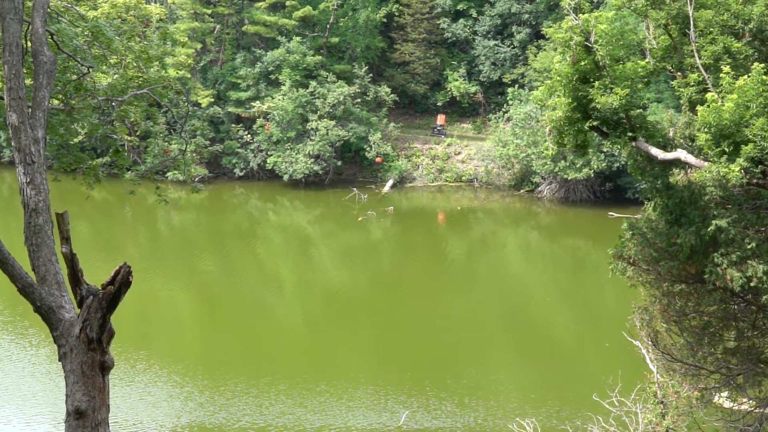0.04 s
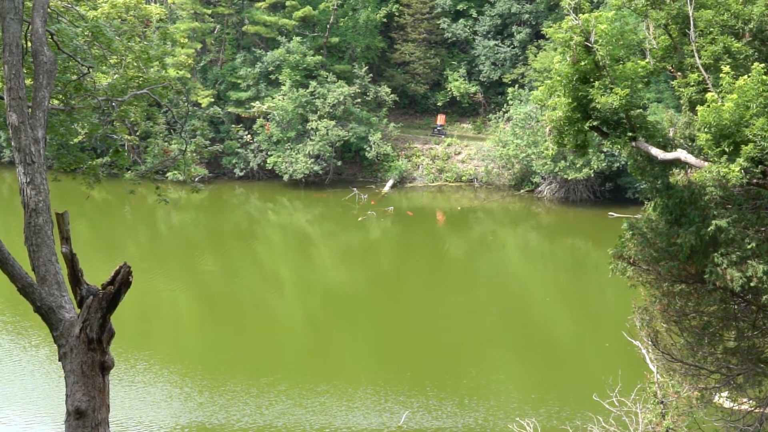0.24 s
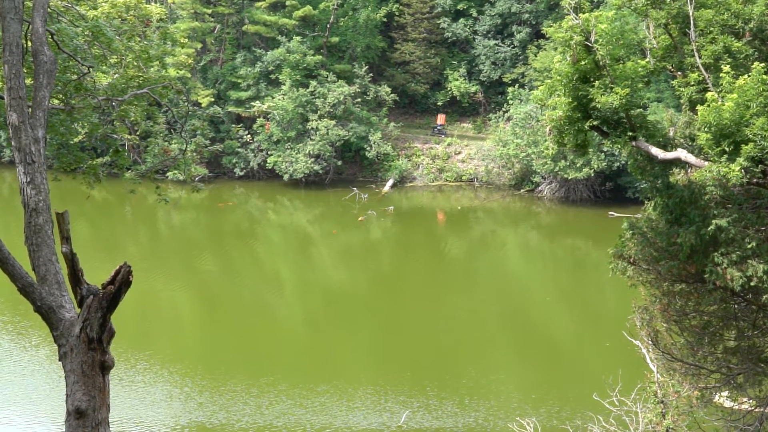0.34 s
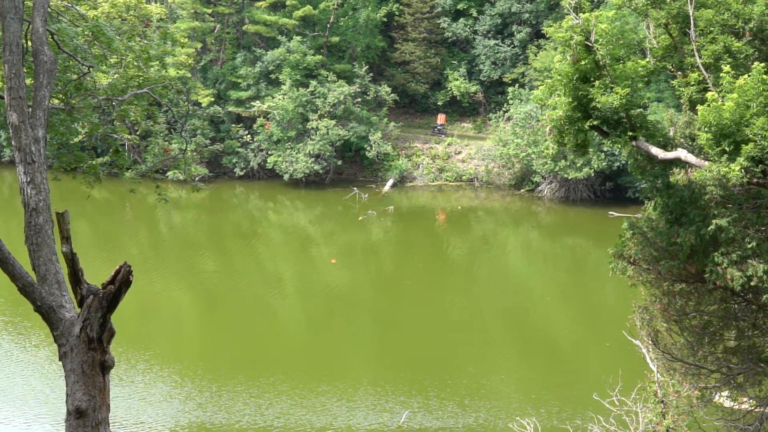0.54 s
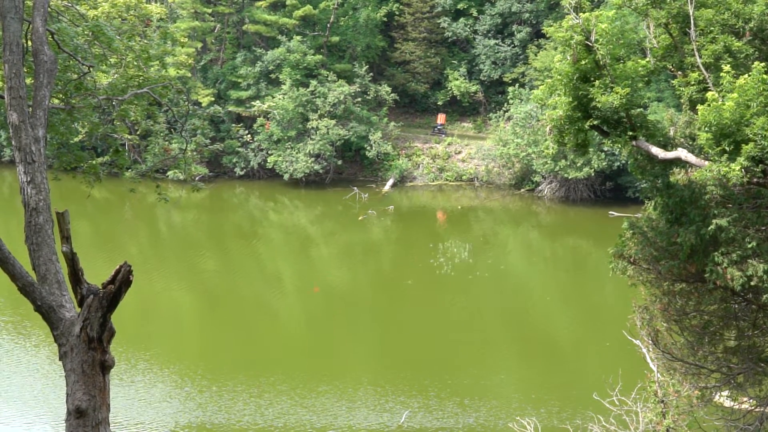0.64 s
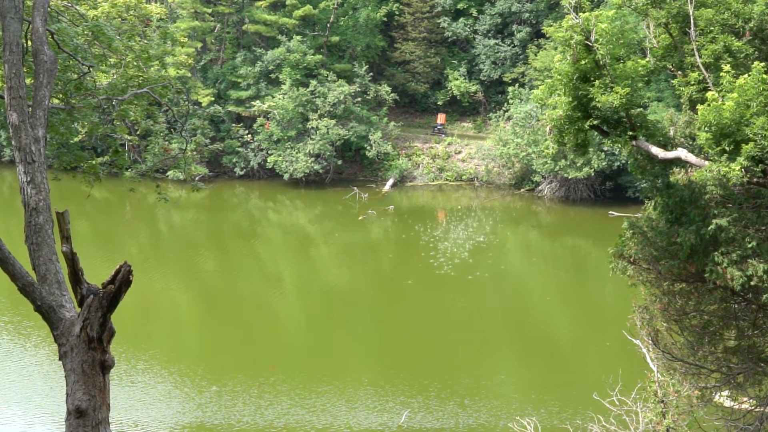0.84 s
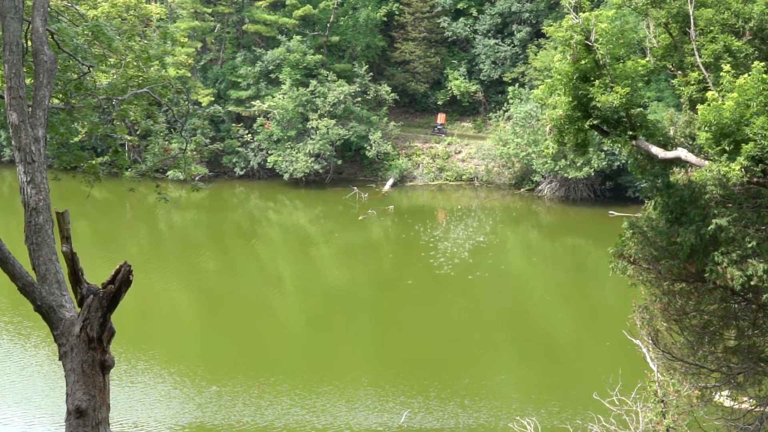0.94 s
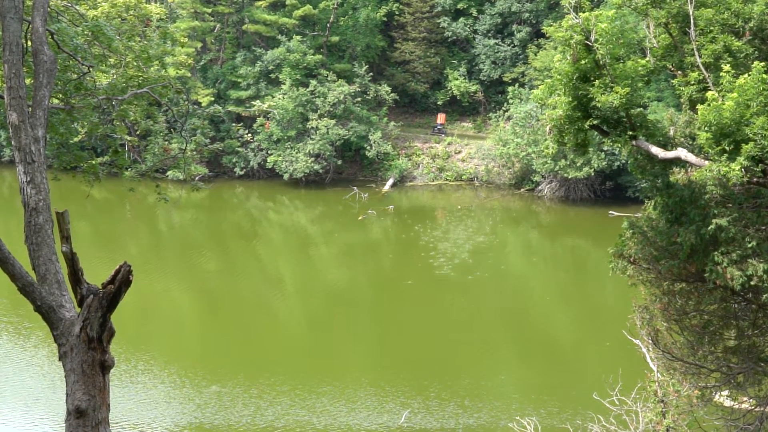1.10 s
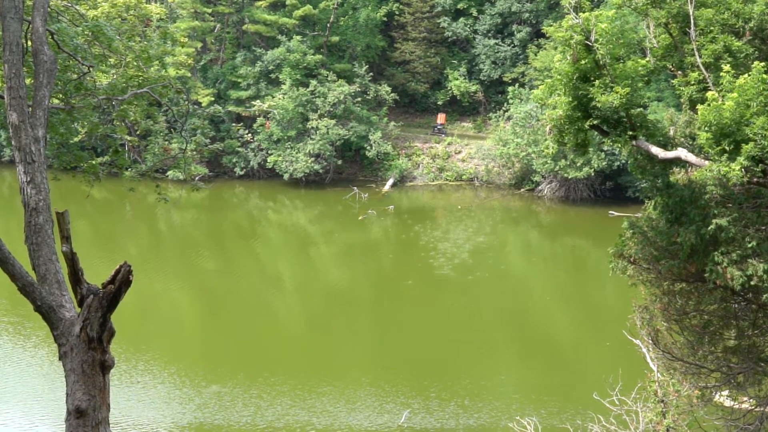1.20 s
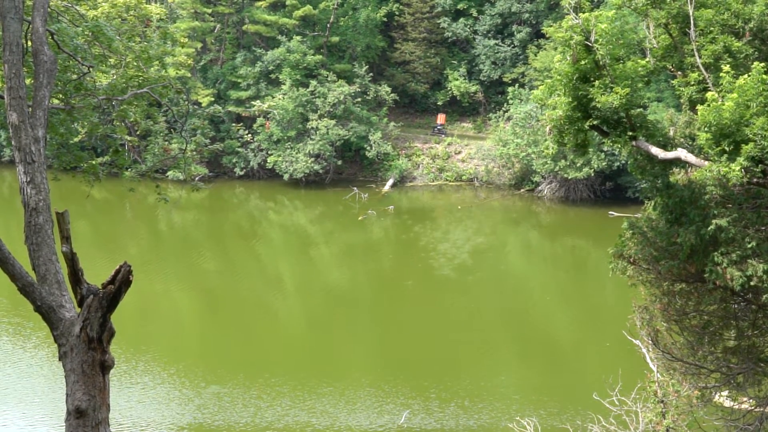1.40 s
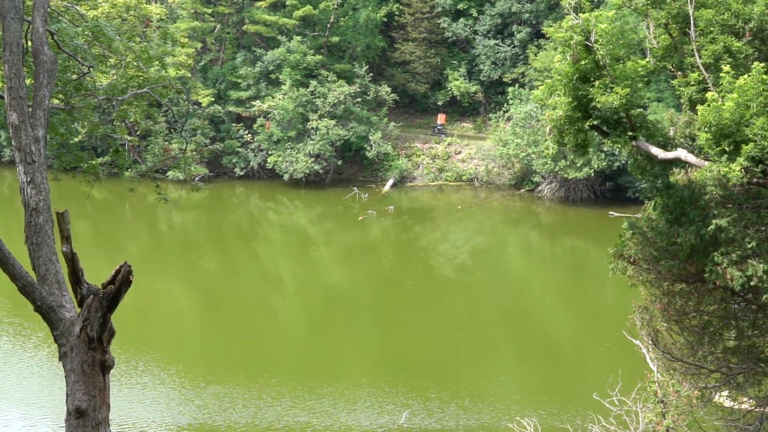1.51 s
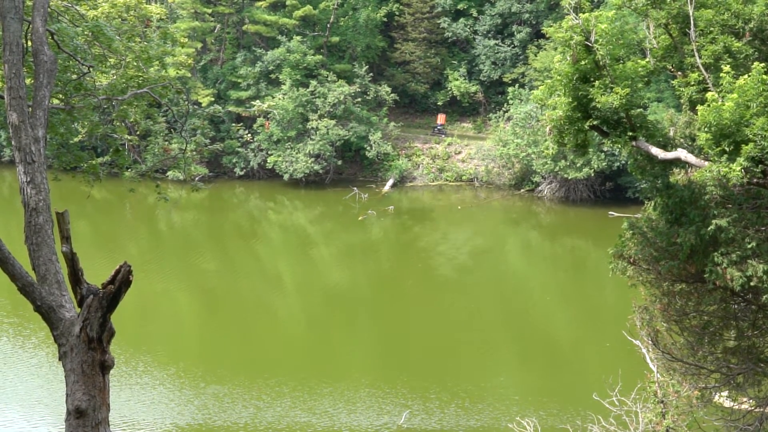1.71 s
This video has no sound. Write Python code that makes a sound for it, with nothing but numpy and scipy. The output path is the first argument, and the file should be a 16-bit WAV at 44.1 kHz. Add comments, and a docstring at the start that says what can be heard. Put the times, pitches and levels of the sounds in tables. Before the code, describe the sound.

A rifle fires once close to the microphone, loud enough to overload it. The blast roars through nearby trees and rolls back duller from the pond's far bank. As it fades, the rifle's action makes a few faint metal clacks.

```python
"""A rifle shot across a wooded pond

A rifle fires close to the microphone: its steel action (the moving parts) snaps, and the muzzle blast
overloads the input. Near trees and then the side banks scatter the blast back as a bright roar; the far
bank answers with a duller, rolling echo. As that dies into the outdoor background, a very faint whistle
sinks and the action is worked, with a few small metal clacks."""
import sys
import numpy as np
from scipy import signal
from scipy.fft import rfft, irfft
from scipy.io import wavfile

SR = 44100
rng = np.random.default_rng(int(sys.argv[2]) if len(sys.argv) > 2 else 0)


def store_wav(level_fs):
    """Save 16-bit WAV to argv[1]."""
    pcm = np.round(np.clip(np.atleast_2d(level_fs), -1, 1) * 32767)
    wavfile.write(sys.argv[1], SR, pcm.T.astype(np.int16))


N = 77175
SHOT_S = 0.2063


def undb(db):
    """Turn decibels (dB) into a number to multiply by."""
    return 10 ** (np.asarray(db) / 20)


def clock():
    """The time of each sample, in seconds."""
    return np.arange(N) / SR


def freqs():
    """The frequencies that make up a spectrum, in Hz."""
    return np.maximum(np.arange(N // 2 + 1) * SR / N, 1)


def gains(colour):
    """Join the points of a colour (rows of Hz and dB) into a gain for every frequency."""
    hz, db = np.array(colour).T
    return undb(np.interp(np.log(freqs()), np.log(hz), db))


def unit(x):
    """Scale a signal to an average power of 1."""
    return x / np.sqrt(np.mean(x ** 2))


def pan(db):
    """Left and right gains. A pan is how many dB louder the left ear is than the right."""
    return undb(np.array([[db], [-db]]) / 2)


def fade(start, fade_s):
    """Start suddenly, then die away. The fade time is how long a 60 dB drop takes."""
    age = clock() - start
    return (age >= 0) * undb(-60 * np.maximum(age, 0) / fade_s)


def causal(gain):
    """A filter with these gains that never sounds before its input (minimum phase)."""
    cepstrum = irfft(np.log(gain + 1e-9), N)
    cepstrum[1:N // 2 + 1] *= 2
    cepstrum[N // 2 + 1:] = 0
    return np.exp(rfft(cepstrum))


def tone(hz):
    """A pure tone that starts at a random point of its wave in each ear."""
    return np.sin(2 * np.pi * (hz * clock() + rng.random((2, 1))))


def waver(width_hz):
    """A random stereo wobble; multiplying a tone by it spreads the pitch over width_hz."""
    noise = rfft(rng.standard_normal((2, N)))
    return unit(irfft(noise / (1 + (2 * freqs() / width_hz) ** 2), N))


def scatter(colour, grain_db=0, tilt_db=0, envelope=1):
    """Noise like many reflections, uneven by grain_db: bass alike in both ears, treble unrelated."""
    # Stereo width. Each row: frequency in Hz, side (what differs between ears) over mid in dB.
    side_levels = [(60, -38), (140, -43), (350, -11.5), (700, -9), (1400, -1.5), (2800, 1.9), (6000, -1.5),
                   (14000, -1)]
    width = gains(side_levels)
    noise = rng.standard_normal((2, N))
    grains = np.repeat(rng.standard_normal(N // 16 + 1), 16)[:N]
    arrivals = unit(noise * undb(grain_db * grains))
    gain = gains(colour) * undb(tilt_db * np.log2(np.maximum(freqs(), 1500)))
    gain = gain / np.sqrt(np.mean(gain ** 2 * (1 + width ** 2)))  # colour sets tone, not loudness
    mid, side = rfft(arrivals * envelope) * causal(gain)
    side = side * causal(width)
    return irfft(np.array([mid + side, mid - side]), N)


def burst(colour, start, db, fade_s, pan_db, tilt_db=0):
    """One short impact: noise that starts at once and dies away."""
    return scatter(colour, tilt_db=tilt_db, envelope=fade(start, fade_s)) * undb(db) * pan(pan_db)


def echo(colour, start, rise, hold, db, fall_db_s, air_db_s, grain_db, pan_db):
    """Scattered sound swells, holds and fades (times in seconds); longer paths lose more treble."""
    age = np.maximum(clock() - start, 0)
    fading_s = np.maximum(age - rise - hold, 0)
    envelope = np.minimum(age / rise, 1) * undb(db - fall_db_s * fading_s)
    spectrum = rfft(scatter(colour, grain_db))
    centres_hz = np.geomspace(400, 16000, 9)
    out = 0
    for hz, share in zip(centres_hz, np.eye(len(centres_hz))):
        band = irfft(spectrum * np.interp(freqs(), centres_hz, share), N)
        out = out + band * undb(-air_db_s * hz / 1000 * fading_s)  # air takes dB per second per kHz
    return out * envelope * pan(pan_db)


def background():
    """A low outdoor rush that dips at the shot and slowly comes part of the way back."""
    # Colour of the rush. Each row: frequency in Hz, relative level in dB.
    outdoors = [(15, -56), (25, -24), (66, -10.5), (175, -15.5), (195, -11.5), (427, -14.5), (503, -18.5),
                (607, -13), (677, -19), (754, -10.5), (818, -17), (1290, -26.5), (1520, -32.5),
                (2160, -42.5), (16000, -53)]
    dip_db = np.interp(clock(), [SHOT_S, 0.25, 1.75], [0, -10, -6])
    return scatter(outdoors) * undb(-36 + dip_db)


def shot():
    """The action snaps, then the muzzle sends out a pressure wave with a crack and a low thump."""
    # Snaps just before the blast. Each row: start in seconds, level in dB, fade in seconds, pan in dB.
    snaps = [(.1969, -12, 0.0059, 9.5), (0.2035, -23.5, 0.019, 31)]
    # Colours of the snaps and the crack. Each row: frequency in Hz, relative level in dB.
    snap_colour = [(200, 11), (1200, 13), (3000, 4), (4600, 2), (7000, 6), (14000, 13), (17000, 10)]
    crack_colour = [(40, -12), (200, -18), (800, -5), (1800, -8), (4000, 1), (7000, -12), (9300, 2.5),
                    (13000, -7.5), (16000, -15)]
    push_s, pan_db = 0.000756, 5.5
    thump_hz, rise_s, fade_s = 75.6, 0.012, 0.049
    age = np.maximum(clock() - SHOT_S, 0)
    wave = np.sin(np.pi * np.minimum(age / push_s, 2)) * undb(-6) * pan(pan_db)  # one push, one pull
    thump_db = -21.5 - 60 * np.maximum(age - rise_s, 0) / fade_s
    thump = np.sin(2 * np.pi * thump_hz * age) * np.minimum(age / rise_s, 1) * undb(thump_db)
    crack = burst(crack_colour, SHOT_S + push_s, db=-7, fade_s=0.025, pan_db=pan_db)
    return wave + thump + crack + sum(burst(snap_colour, *row) for row in snaps)


def woods():
    """The blast comes back from ever farther away: trees, side banks, far leaves, far bank, hills."""
    # Colours of the echoes. Each row: frequency in Hz, relative level in dB.
    tree_colour = [(18, -72), (30, -49), (138, -7.5), (210, -8.5), (259, -1.5), (415, -3.5), (684, -5),
                   (913, -5.5), (1860, -11), (2680, -11.5), (3220, -14.5), (7090, -12), (16000, -24.5)]
    bank_colour = [(18, -53), (30, -36), (64, -34), (127, -12.5), (227, -7), (303, -5), (345, -5),
                   (415, -6), (461, -5.5), (584, -11), (721, -4), (801, -9.5), (866, -6), (1910, -17),
                   (7270, -18.5), (16000, -38)]
    leaf_colour = [(300, -16), (1500, 3.5), (3000, -1), (5300, 0), (7000, -10), (9000, -11.5), (12000, -28),
                   (16000, -73)]  # a hiss from the far waterline
    far_colour = [(30, -57), (59, -44), (84, -12), (138, -9.5), (175, -1.5), (233, -1.5), (336, 1),
                  (450, -9), (660, 0.5), (900, -4), (1320, -15), (2300, -21), (3400, -32), (5300, -34.5),
                  (7000, -36.5), (9200, -44.5), (12000, -57), (16000, -77)]
    hill_colour = [(60, -27.5), (170, -3.5), (320, 1.5), (480, -3.5), (700, -10), (900, -5.5), (1300, -10),
                   (3000, -34), (12000, -52)]  # a dull roll
    # Sharp echoes off single trunks and rock faces.
    # Each row: start in seconds, level in dB, fade in seconds, pan in dB.
    near_slaps = [(0.2174, -14, 0.036, 6), (.2475, -11.5, 0.027, 8)]
    far_slaps = [(0.558, -22, 0.11, 0), (.714, -18, 0.12, -1.5), (0.781, -19, 0.023, 3),
                 (.8375, -11.5, 0.018, -5), (0.853, -17, 0.032, -2), (.955, -22, 0.016, -7),
                 (1.188, -28.5, 0.15, 2), (1.248, -27.5, 0.056, 1.5)]
    trees = echo(tree_colour, SHOT_S, rise=0.0027, hold=0.1, db=-15,
                 fall_db_s=66, air_db_s=2.5, grain_db=-1, pan_db=1.1)
    banks = echo(bank_colour, 0.27, rise=0.091, hold=0.11, db=-15,
                 fall_db_s=21, air_db_s=5.5, grain_db=1, pan_db=-1.25)
    leaves = echo(leaf_colour, 0.681, rise=0.08, hold=0.044, db=-26.5,
                  fall_db_s=44.5, air_db_s=3, grain_db=-1, pan_db=0)
    far_bank = echo(far_colour, 0.747, rise=0.032, hold=0.15, db=-18,
                    fall_db_s=30.5, air_db_s=2, grain_db=2, pan_db=-0.8)
    hills = echo(hill_colour, 0.93, rise=0.11, hold=0.14, db=-33.5,
                 fall_db_s=10.5, air_db_s=8, grain_db=1.5, pan_db=1)
    flutter = undb(0.64 * waver(width_hz=70)[0])  # clumps of trees make the roar flutter
    slaps = sum(burst(tree_colour, *row) for row in near_slaps)
    slaps += sum(burst(far_colour, *row) for row in far_slaps)
    return (trees + banks + leaves + far_bank + hills) * flutter + slaps


def booms():
    """Where a whole slope faces the shot, it sends back a low swell that dies quickly."""
    # Colour of a boom. Each row: frequency in Hz, relative level in dB.
    colour = [(40, -28), (100, -13), (170, -2.5), (260, 1), (390, 3), (520, -6), (1500, -48), (8000, -67)]
    # One boom per slope. Each row: start in seconds, rise in seconds, level in dB, fall in dB per second.
    slopes = [(.33, 0.064, -20, 153), (.545, 0.017, -27.5, 258), (.82, 0.037, -23, 108)]
    out = 0
    for start, rise, db, fall_db_s in slopes:
        age = np.maximum(clock() - start, 0)
        level = undb(db - fall_db_s * np.maximum(age - rise, 0))
        out = out + scatter(colour) * np.minimum(age / rise, 1) * level
    return out


def whistle():
    """A very faint, blurred whine sinks in pitch as the echoes die."""
    # Path of the whine. Each row: time in seconds, pitch in Hz, level in dB.
    path = [(1.05, 9020, -79), (1.32, 8750, -62.5), (1.44, 8500, -73)]
    times, hz, db = np.array(path).T
    pitch = np.interp(clock(), times, hz)
    level = np.interp(clock(), times, undb(db), left=0, right=0)
    return np.sin(2 * np.pi * np.cumsum(pitch) / SR) * waver(width_hz=160) * level


def action():
    """The rifle's steel parts slide, knock, ping and ring faintly; the trees answer softly."""
    # Colours of the steel and of its echo. Each row: frequency in Hz, relative level in dB.
    steel = [(1500, -18), (2400, -8), (3200, -0.5), (4000, -10), (5100, -0.5), (6400, -9), (8000, -3.5),
             (9100, -8), (10400, -5), (11800, -17), (14300, -11), (16000, -14)]
    echo_colour = [(1500, -3), (3000, 6), (5000, 0), (7800, 2.5), (10500, -20), (13000, -16), (16000, -15)]
    # Knocks of steel on steel. Each row: start in seconds, level in dB, fade in seconds, pan in dB,
    # treble tilt in dB per octave, ping pitch in Hz, ping level in dB relative to the knock.
    clacks = [(1.4412, -31.5, 0.021, -1.5, 0.5, 7900, -11), (1.45, -34, 0.016, 3, 4, 5350, -1),
              (1.461, -45, 0.021, -6, 1, 3150, 10.5), (1.474, -48, .025, 0, 4, 14300, -3),
              (1.493, -47, .015, 6, 0, 5300, -8), (1.5675, -35, 0.013, -4, -8.5, 4500, -1)]
    # Ringing notes. Each row: pitch in Hz, level in dB relative to each knock, fade in seconds.
    rings = [(3040, -20, 0.61), (4737, -20.5, 0.78), (6700, -30, 0.56), (7740, -24, 0.74)]
    ring_rise_s = 0.065
    slide = echo(steel, 1.465, rise=0.016, hold=0.01, db=-47,
                 fall_db_s=95, air_db_s=13, grain_db=1, pan_db=2)
    tree_echo = echo(echo_colour, 1.48, rise=0.084, hold=0.05, db=-56.5,
                     fall_db_s=45, air_db_s=6, grain_db=5, pan_db=-3)
    out = slide + tree_echo
    for start, db, fade_s, pan_db, tilt_db, ping_hz, ping_db in clacks:
        out += burst(steel, start, db, fade_s, pan_db, tilt_db)
        out += tone(ping_hz) * fade(start, fade_s) * undb(db + ping_db) * pan(pan_db)
    for hz, ring_db, fade_s in rings:
        energy = 0
        for start, db, *_ in clacks:
            swell = np.clip((clock() - start) / ring_rise_s, 0, 1)
            energy += (fade(start, fade_s) * swell * undb(db + ring_db)) ** 2
        out += tone(hz) * waver(width_hz=93) * np.sqrt(energy)  # a rough, uneven ring
    return out


def scene():
    """Add all the sounds together, in stereo."""
    return background() + shot() + woods() + booms() + whistle() + action()


def record(dry):
    """The overloaded input flattens the loudest peaks, then a filter cuts the highest treble."""
    top_hz = 15850
    treble_cut = signal.ellip(10, 0.2, 80, top_hz, fs=SR, output="sos")
    return signal.sosfilt(treble_cut, np.clip(dry, -0.95, 0.95))


dry = scene()
out = record(dry)
store_wav(out)
```